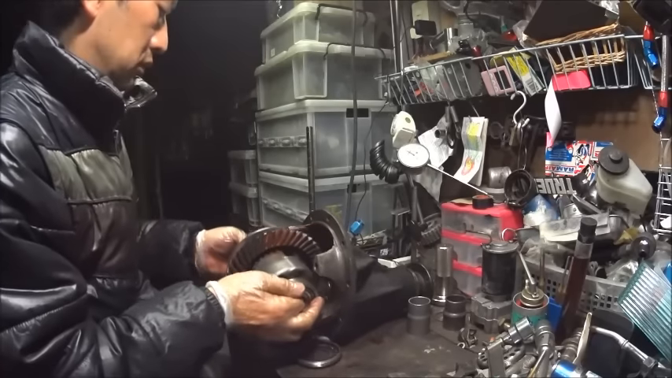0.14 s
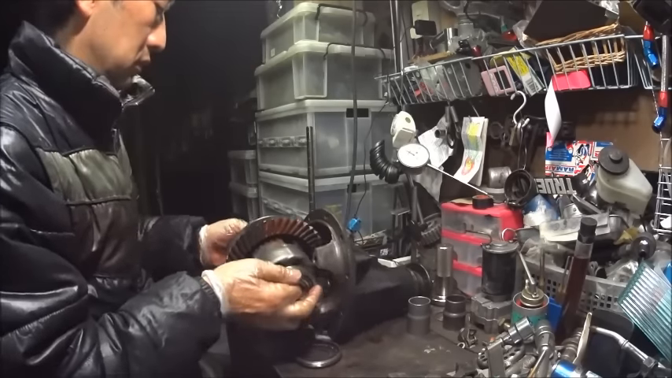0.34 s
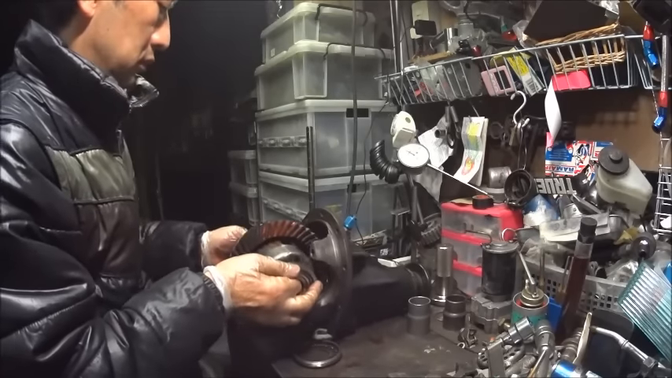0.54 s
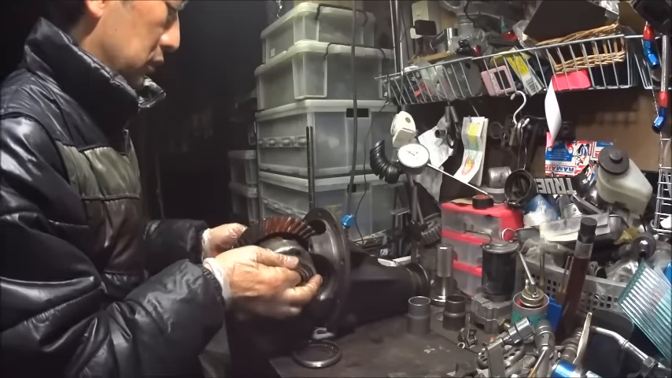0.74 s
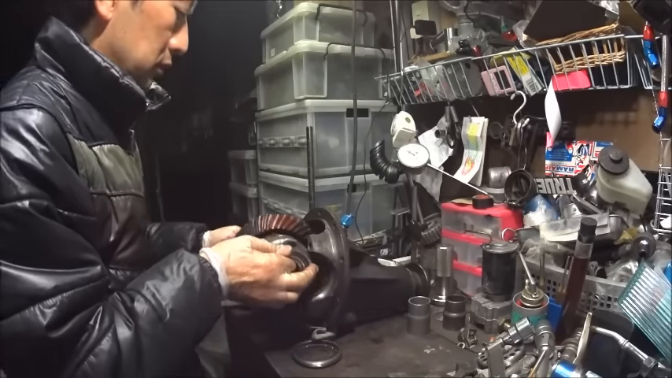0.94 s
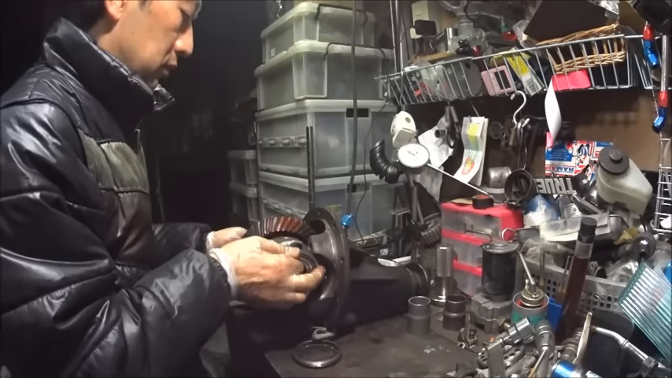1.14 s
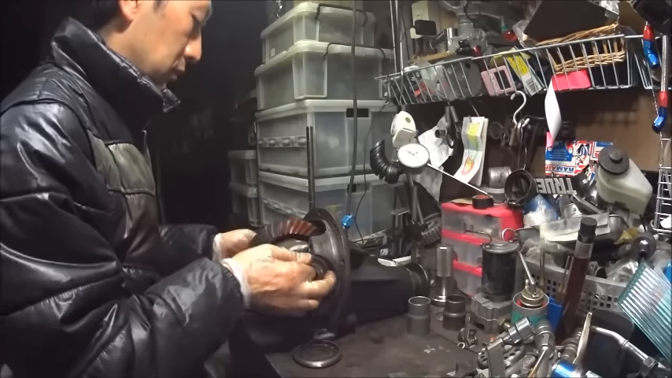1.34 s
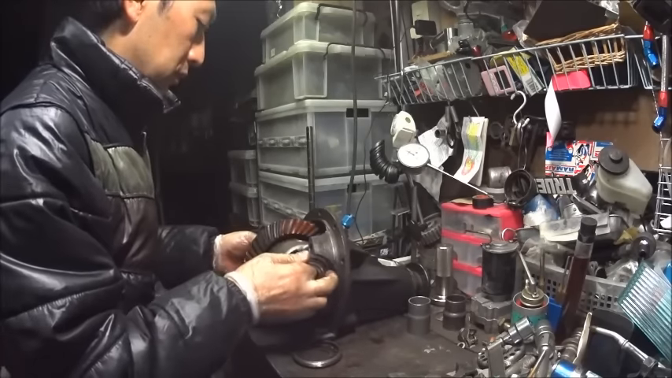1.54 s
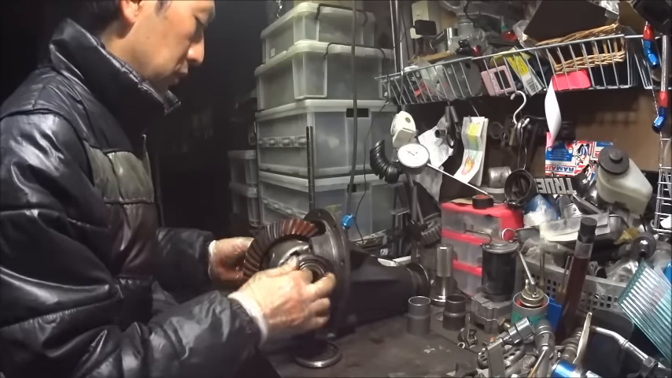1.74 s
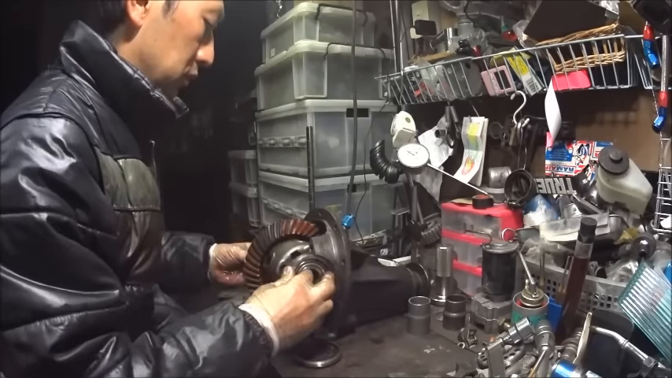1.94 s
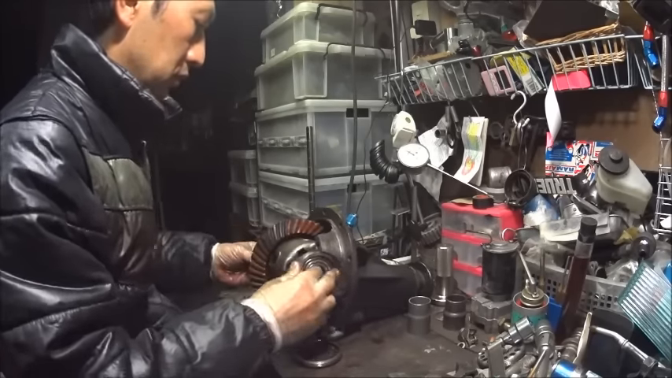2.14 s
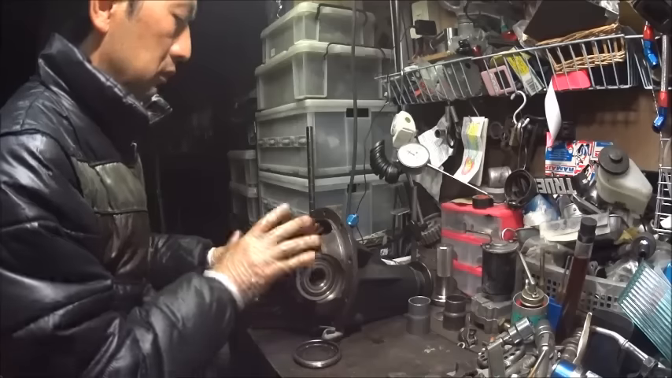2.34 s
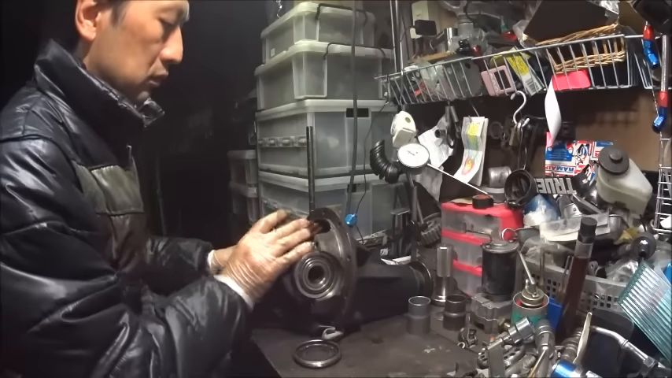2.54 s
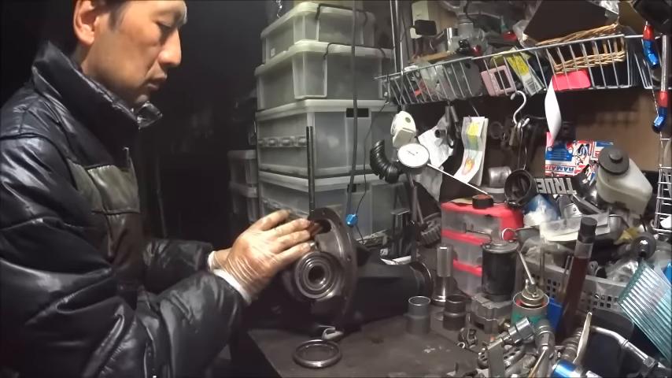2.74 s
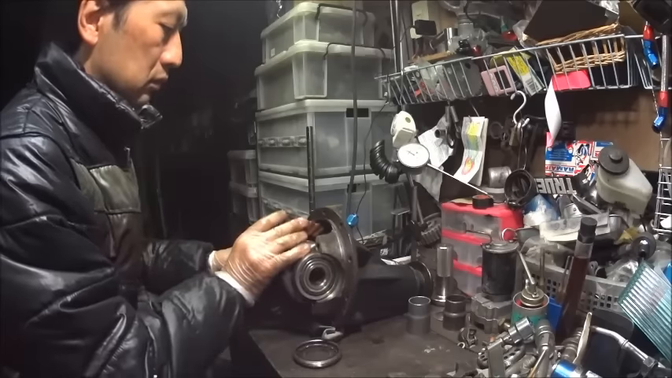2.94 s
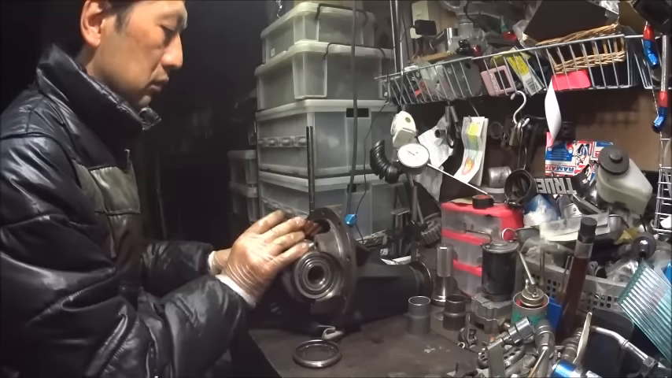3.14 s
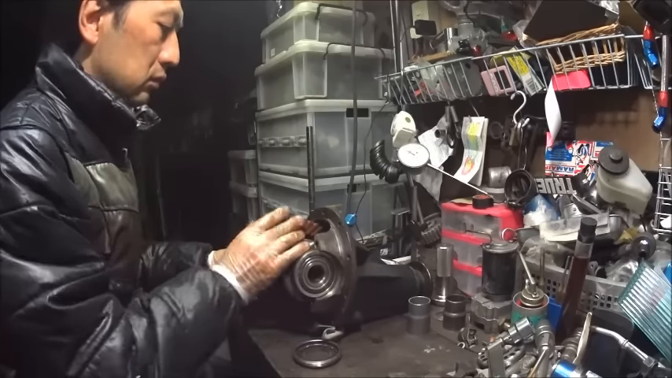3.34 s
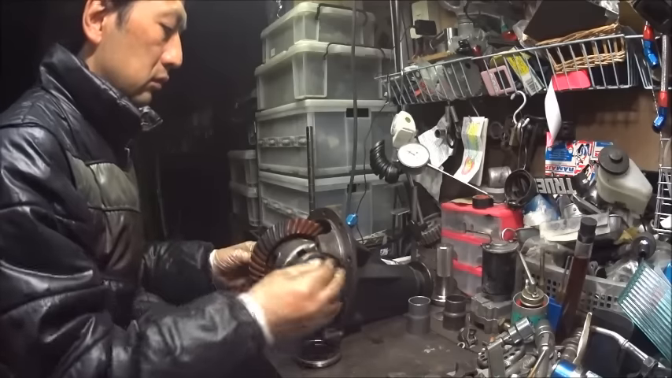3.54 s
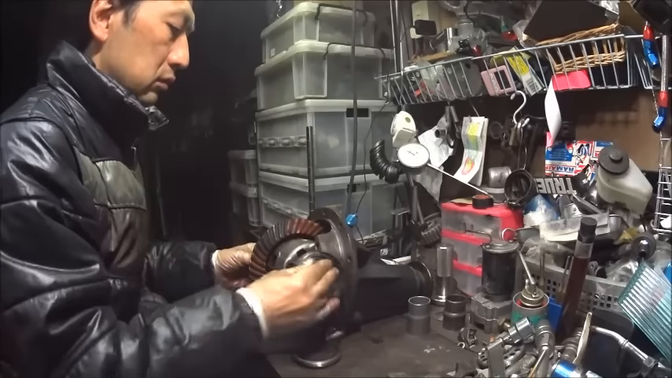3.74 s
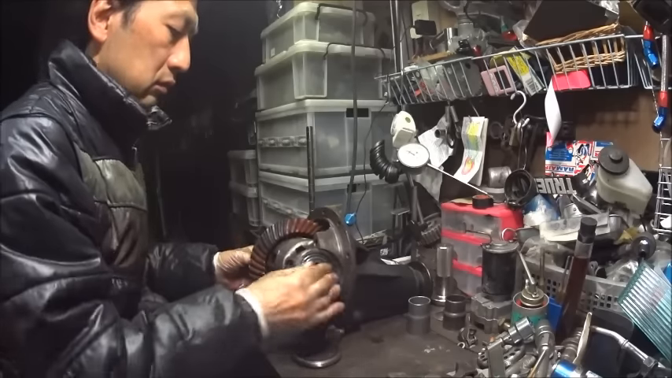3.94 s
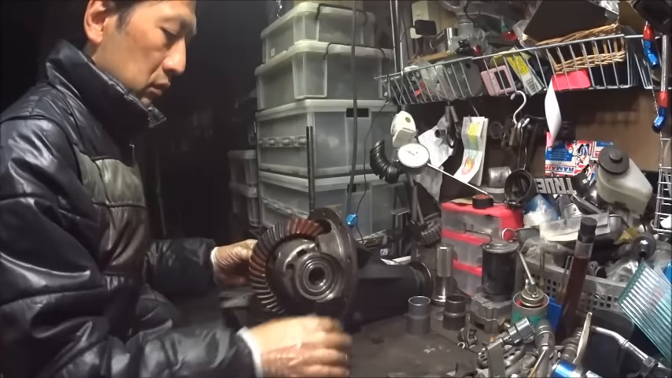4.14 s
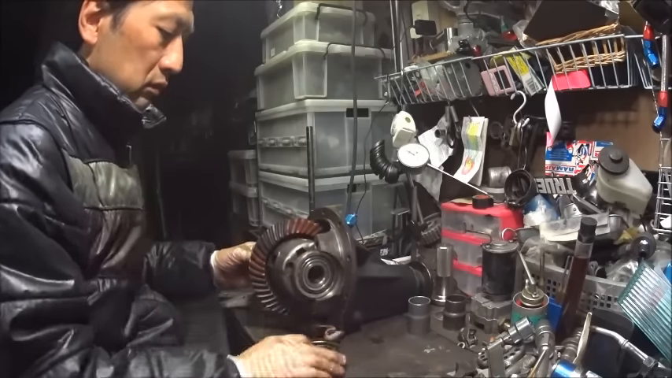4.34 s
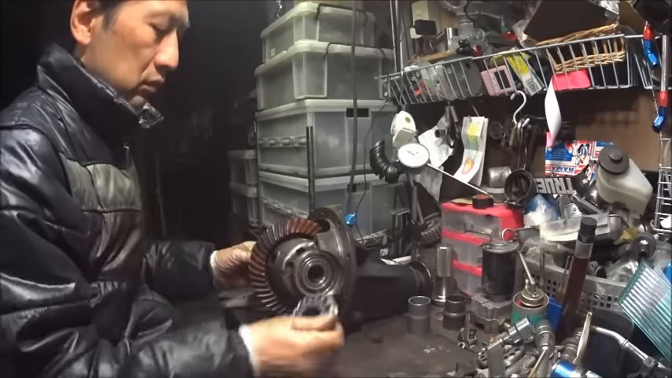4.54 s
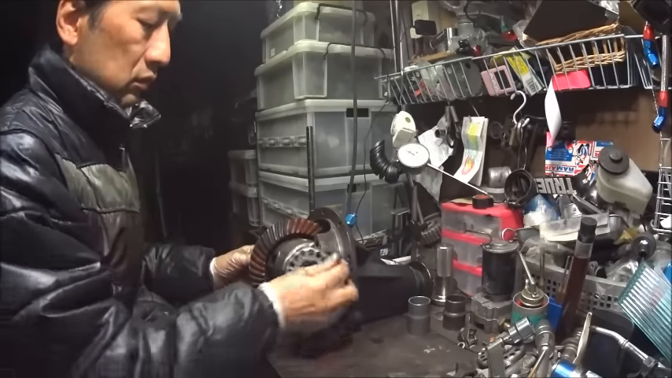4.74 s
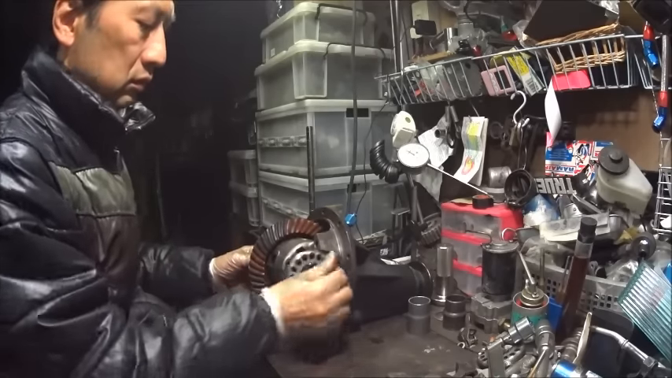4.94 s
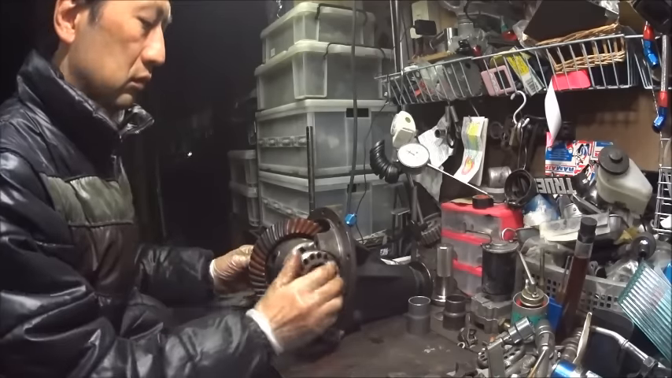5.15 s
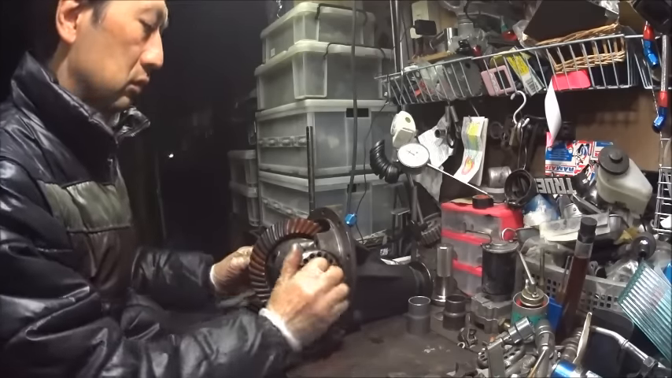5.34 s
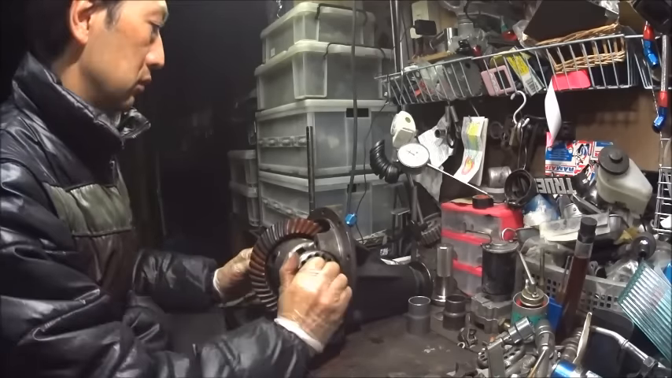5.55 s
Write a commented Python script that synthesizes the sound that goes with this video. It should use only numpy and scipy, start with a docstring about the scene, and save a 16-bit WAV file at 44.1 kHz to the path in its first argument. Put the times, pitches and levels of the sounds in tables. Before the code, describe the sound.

A heavy steel gear knocks and thumps irregularly on a workbench, then a small bearing ring clinks brightly, with jacket rustle in a small garage.

```python
"""A heavy steel gear assembly knocks in its housing and thumps the workbench of a small, cluttered garage.
Then a bearing ring is slid off the bench and clinks into its seat: blows ring decaying modes and noise
through a springy contact. Steel that slides or scrapes is a run of small catches over a hiss.
A padded nylon jacket swishes as a spray of ticks; steady coloured noise, a drone and a whirr fill the room."""
import sys
import numpy as np
from scipy import signal
from scipy.fft import rfft, irfft, next_fast_len
from scipy.io import wavfile

SR = 44100
rng = np.random.default_rng(int(sys.argv[2]) if len(sys.argv) > 2 else 0)


def log_audio(samples):
    """Write samples as a 16-bit WAV file to the path given in sys.argv[1]."""
    # one column per channel
    frames = np.atleast_2d(samples).T
    # limit to full scale, then quantise
    limited = np.clip(frames, -1, 1)
    pcm = np.round(limited * 32767).astype(np.int16)
    wavfile.write(sys.argv[1], SR, pcm)


N = 250488
TOP_HZ = 11100
TIME = np.arange(N) / SR  # s
AGE = TIME[:SR // 7]  # s since a blow
SIDES = np.array([[1], [-1]])  # left, right


def gear():
    """The gear assembly knocks in its housing: lightly damped steel, low contact resonances."""
    # knocks: start_s, bench_rel_db, steel_rel_db, contact_hz (low soft, high hard),
    # contact (0 on the flange, 1 on the hub)
    knocks = [(.012,-39,-53,2210,0.98), (.064,-42.5,-56,1470,0.11), (.1095,-51,-43.5,2180,0.79),
              (.2272,-27.5,-22.5,1620,0.079), (.233,-36.5,-28,2730,0.17), (.3245,-22.5,-28,1700,0.3),
              (.427,-35.5,-51,1900,0.74), (.5105,-19,-33.5,690,0.44), (.598,-39.5,-56,1520,0.82),
              (.638,-30,-34.5,1040,0.67), (.698,-36.5,-66,1110,0.97), (.704,-51,-44,2270,1),
              (.715,-35.5,-69,1500,0.84), (.769,-32.5,-43.5,694,1), (.793,-30.5,-74,730,0.34),
              (.806,-30,-74,1270,1), (1.09,-36.5,-33,1970,0.75), (1.1175,-29,-39,970,.4),
              (1.143,-34,-58,1000,0), (1.165,-30.5,-63,1290,0.89), (1.213,-28,-29.5,1350,0.76),
              (1.2245,-37.5,-30.5,2080,0.6), (1.276,-46,-31.5,730,1), (1.281,-25,-23.5,970,1),
              (1.3285,-31,-33,1700,0.46), (1.3545,-26.5,-28.5,5400,0.84), (1.358,-27,-23.5,1550,0.93),
              (1.427,-32.5,-45.5,1400,0.22), (2.045,-45,-47,1080,0.41), (2.076,-31,-41.5,800,1)]
    # steel modes of the gear: mode_hz, contact_0_rel_db, contact_1_rel_db, undamped_t60_s
    gear_modes = [(700, -3, -3, .04), (921, -4, -8, .1), (991, -9, -10, .09), (1185, -8, 0, .06),
                  (1475, -9, -15, .07), (1755, -14, -5, .06), (1809, -11, 0, .08), (2140, 2, -5, .05),
                  (2192, 3, -1, .07), (2331, -6, -1, .05), (3120, -20, -10, .06), (3570, 4, -11, .04),
                  (3634, 7, -8, .06), (4212, -12, -3, .06), (4790, -10, -8, .07), (4893, -7, -15, .09),
                  (5835, -1, -3, .04), (6934, -7, -7, .06)]
    # dense clatter of the touching parts: freq_hz, rel_db
    gear_clatter = [(600, 14.5), (2200, -5), (5000, -1.5), (11000, -3)]
    return blows(knocks, gear_modes, gear_clatter, q=2.15, snap=1.7, damping_db_per_s=140, held_db=-1.5,
                 clatter_db=-1, clatter_t60_s=0.032, crack_db=11.5, crack_t60_s=0.024,
                 thud_db=12.5, thud_t60_s=0.062, bench_hz=94, steel_hz=580)


def bearing():
    """The bearing ring touches steel: hard bright contacts, strongly damped by the fingers."""
    # clinks: start_s, bench_rel_db, steel_rel_db, contact_hz (low soft, high hard),
    # contact (0 loose, 1 pressed by the fingers)
    clinks = [(2.1975,-54,-45,10900,0.55), (2.838,-54,-38.5,2480,0.38), (2.861,-72,-47,2600,0.84),
              (3.175,-62,-47,2270,0.4), (3.7256,-33.5,-24.5,6550,1), (3.7265,-53,-34.5,3930,1),
              (3.8555,-62,-50,6270,1), (3.8725,-67,-43,6760,0.88), (3.888,-44,-42,5900,0.63),
              (3.898,-33,-37,4900,0.67), (3.9022,-64,-32,5840,1), (4.301,-53,-47.5,6900,.9),
              (4.517,-45,-36.5,10900,1), (4.7793,-73,-17.5,6300,0), (4.7835,-63,-16,9600,0),
              (4.7862,-48,-27.5,3600,0.58), (4.789,-61,-36,3900,0), (4.796,-47,-22,6230,0),
              (4.818,-48,-31,2200,0.76), (4.8885,-45,-31,2000,0.38), (4.968,-57,-44,7500,0.31),
              (5.0595,-54,-38.5,2400,0.24), (5.088,-45.5,-45,690,0.95), (5.0985,-62,-38.5,1900,0.42),
              (5.207,-49.5,-41,2540,0.08)]
    # steel modes of the ring: mode_hz, contact_0_rel_db, contact_1_rel_db, undamped_t60_s
    ring_modes = [(1464, -8, -11, .1), (2078, -4, 4, .09), (2210, 3, -3, .12), (2466, -8, -5, .1),
                  (2590, -5, -2, .09), (3133, -12, -5, .07), (3745, 0, -3, .07), (3841, 5, -2, .055),
                  (4300, -1, -5, .025), (5771, -10, -8, .06), (6550, -8, 2, .04), (7025, -10, -6, .05),
                  (9479, 6, -5, .05), (9651, -2, -7, .1), (10384, 13, -2, .08), (10510, 6, -4, .07),
                  (10941, 11, -2, .065)]
    # dense clatter of the touching parts: freq_hz, rel_db
    ring_clatter = [(600, 2.5), (2200, 1), (5000, -1.5), (11000, -2.5)]
    return blows(clinks, ring_modes, ring_clatter, q=1.0, snap=4.5, damping_db_per_s=1500, held_db=-11.0,
                 clatter_db=-1.5, clatter_t60_s=0.18, crack_db=6.5, crack_t60_s=0.027,
                 thud_db=19.5, thud_t60_s=0.09, bench_hz=126, steel_hz=560)


def blows(events, modes, clatter, q, snap, damping_db_per_s, held_db, clatter_db, clatter_t60_s,
          crack_db, crack_t60_s, thud_db, thud_t60_s, bench_hz, steel_hz):
    """Each blow rings the part through the springy contact, and its weight thumps the bench."""
    # modes of the wooden bench: mode_hz, contact_0_rel_db, contact_1_rel_db, t60_s
    bench_modes = [(94, -21.5, -23, 0.22), (174, -17, -12.5, 0.16), (262, -34, -2, 0.066),
                   (285, -36, 7.5, 0.019), (427.2, -0.5, 0.5, 0.091), (480, -18, -16, 0.05),
                   (677, -9.5, -20, 0.12)]
    attack_s = 0.0012
    times, bench_db, steel_db, contact_hz, contact = np.transpose(events)
    contact = np.clip(contact, 0, 1)
    press = contact[:, None, None]
    pairs = rng.standard_normal((len(times), 2, len(AGE)))
    grain = spread([pairs[:, :1], pairs[:, 1:]], width=0.2)

    # a crack at the contact, then the dense, quickly damped modes of all the parts that touch
    crack_gain = undb(crack_db - 60 * AGE / crack_t60_s)
    clatter_gain = undb(clatter_db - (60 / clatter_t60_s + damping_db_per_s * press) * AGE)
    tones = undb(held_db * press) * ring(modes, contact, damping_db_per_s, scatter_db=3.8)
    steel = tones + colour(grain, clatter) * (crack_gain + clatter_gain)
    steel = contact_spring(steel, contact_hz, q, snap)
    steel = band(steel, steel_hz, TOP_HZ + 400, order=4)  # small parts radiate no bass

    thud = grain * undb(thud_db - 60 * AGE / thud_t60_s)
    bench = ring(bench_modes, contact, 0, scatter_db=0.6) + thud
    bench = bench * (1 - np.exp(-AGE / attack_s))  # the heavy top takes a moment to get moving
    bench = band(bench, 44, 1350, order=2)
    bench = band(bench, bench_hz, 426, order=2)  # the wooden top passes no treble

    out = np.zeros((2, N))
    for start_s, sound in zip(times, at_level(steel, steel_db) + at_level(bench, bench_db)):
        add(out, start_s, sound)
    return out


def ring(modes, contact, damping_db_per_s, scatter_db, width=0.65):
    """Decaying modes per blow (blows x 2 x samples), weighted by contact and chance; contact damps them."""
    hz, db0, db1, t60_s = np.transpose(modes)
    draws = rng.standard_normal((len(contact), 4, len(hz)))
    size, phase, lean, angle = draws.transpose(1, 0, 2)
    weight_db = db0 + contact[:, None] * (db1 - db0) + scatter_db * size
    weight = undb(weight_db) * np.exp(.5j * phase)
    # the high modes radiate unevenly to left and right
    side = width * hz / (hz + 1000) * lean * np.exp(1j * np.pi * angle)
    tones = undb(-60 * AGE / t60_s[:, None]) * np.exp(2j * np.pi * hz[:, None] * AGE)
    sound = ((weight[:, None] * (1 + SIDES * side[:, None])) @ tones).imag
    return sound * undb(-damping_db_per_s * contact[:, None, None] * AGE)


def contact_spring(x, hz, q, snap):
    """Damped contact spring: shapes its resonance, passes less and less above it; snap adds treble."""
    size = 2 * len(AGE)
    s = 1j * np.fft.rfftfreq(size, 1 / SR) / hz[:, None, None]
    response = (1 + snap * s) / (1 + s / q + s * s)
    return irfft(rfft(x, size) * response)[..., :len(AGE)]


def at_level(sounds, db):
    """Bring each blow to its level: its whole energy as rms over 20 ms."""
    rms = np.sqrt(np.sum(sounds ** 2, axis=(1, 2)) / (2 * .02 * SR))
    return sounds * (undb(db) / rms)[:, None, None]


def add(out, start_s, sound):
    """Mix a short sound in at start_s."""
    i = int(max(start_s, 0) * SR)
    out[:, i:i + sound.shape[1]] += sound[:, :N - i]


def slides():
    """Steel slides or rolls over the bench or in its seat: dull friction."""
    # strokes: centre_s, rel_db, half_s (to 1/e of the power)
    slide_strokes = [(.68, -52, 0.046), (.81, -58.5, 0.062), (1.155, -55, 0.014), (1.48, -44.5, 0.013),
                     (2.11, -44.5, 0.039), (4.41, -47, 0.0055), (4.472, -36.5, 0.015), (4.505, -39, 0.016),
                     (5.63, -53.5, 0.21)]
    # spectrum: freq_hz, rel_db
    slide_colour = [(100, -15.5), (200, -3.5), (300, 2), (400, -2), (550, -4), (800, -12), (1500, -6),
                    (2200, -15.5), (5000, -23), (11000, -30)]
    return friction(slide_strokes, slide_colour, catches_per_s=810, hiss=0.24)


def scrapes():
    """The ring scrapes lightly on steel: bright friction with dense catches."""
    # strokes: centre_s, rel_db, half_s (to 1/e of the power)
    scrape_strokes = [(1.47, -68, 0.0063), (3.805, -44, .012), (3.847, -36, 0.009), (5.28, -38.5, 0.018)]
    # spectrum: freq_hz, rel_db
    scrape_colour = [(500, -35), (2500, -21), (4300, -3), (5500, -11), (7200, -8), (9000, -20),
                     (11000, -7.5)]
    return friction(scrape_strokes, scrape_colour, catches_per_s=2400, hiss=0.18)


def friction(strokes, spectrum, catches_per_s, hiss):
    """Sliding steel sticks and slips: a run of small random catches over a fine hiss."""
    catches = (rng.random(N) < catches_per_s / SR) * rng.standard_normal(N)
    rub = catches + hiss * spread(rng.standard_normal((2, N)), width=0.34)
    return colour(rub, spectrum) * swells(strokes)


def jacket(grain_db=2.5, sleeve_db=4.0, folds_db=2.0):
    """Nylon threads catch on each other in a dense spray of tiny ticks, as fast as the arm moves."""
    # sleeve rub following the arm speed: time_s, rel_db (before sleeve_db)
    arm = [(0.0, -52), (0.22, -57.5), (0.68, -66.5), (1.19, -97), (1.33, -57.5), (2.1, -57), (2.24, -57),
           (2.36, -50), (2.96, -62.5), (3.27, -67.5), (3.57, -59), (4.08, -55.5), (4.51, -47), (4.7, -44),
           (4.98, -51), (5.19, -46.5), (5.44, -52.5), (5.68, -61.5)]
    # single swishes at a reach or a change of grip: centre_s, rel_db, half_s (to 1/e of the power)
    swishes = [(.115, -42, 0.026), (.45, -39.5, 0.013), (.893, -44, 0.013), (1.64, -46.5, 0.035),
               (2.245, -40, 0.033), (2.41, -39, 0.051), (2.525, -42, 0.021), (2.72, -47.5, .03),
               (3.39, -45, 0.035), (3.53, -44.5, 0.09), (3.83, -48.5, 0.094), (4.19, -45, 0.061),
               (4.36, -38.5, 0.026), (4.52, -38.5, 0.045), (4.6, -44, 0.024), (5.21, -37.5, 0.017),
               (5.29, -48, 0.026)]
    # spectrum of the nylon: freq_hz, rel_db
    cloth = [(300, -41), (650, 1), (1200, -2.5), (2200, -4), (4300, -5), (7000, -4), (9000, -6.5),
             (11000, -2.5)]
    tick_db = grain_db * np.minimum(rng.exponential(size=N), 5)
    threads = rng.standard_normal((2, N)) * undb(tick_db)
    sleeve = undb(np.interp(TIME, *np.transpose(arm)) + sleeve_db)
    speed = np.hypot(sleeve, swells(swishes))
    folds = undb(folds_db * walk(90))
    return colour(spread(threads, width=0.43), cloth) * speed * folds


def swells(rows):
    """Envelope of bell-shaped swells, summed as power."""
    return np.sqrt(sum(undb(db) ** 2 * np.exp(-((TIME - s) / half_s) ** 2) for s, db, half_s in rows))


def air(wash_db=-50.5, drone_db=-61, whirr_db=-68):
    """Room noise: a wide, nearly steady wash, with narrow noise bands as low drone and faint whirr."""
    # spectrum of the wash: freq_hz, rel_db
    wash_colour = [(20, -7.5), (44, -4.5), (150, -1.5), (200, -2), (330, -7), (600, -6), (1200, -12.5),
                   (3300, -21.5), (6000, -29), (11000, -29)]
    noise = spread(rng.standard_normal((2, N)), width=0.9)
    wash = colour(noise, wash_colour) * undb(wash_db + 0.12 * walk(2.2))
    drone = unit(band(rng.standard_normal(N), 197, 202.7, order=1)) * undb(drone_db)
    whirr = unit(band(rng.standard_normal(N), 684, 685, order=1)) * undb(whirr_db)
    return wash + drone + whirr


def walk(points_per_s):
    """Random wander: normal draws joined by straight lines."""
    return np.interp(TIME * points_per_s, np.arange(4096), rng.standard_normal(4096))


def garage(x, early_db=-11, early_t60_s=0.12, late_db=-24, late_t60_s=0.636, gap_s=0.0064):
    """Close shelves scatter the sound after a few ms; the clutter leaves only a short, weak tail."""
    age, tail = TIME[:SR // 2], 0
    for db, t60_s in (early_db, early_t60_s), (late_db, late_t60_s):
        noise = spread(rng.standard_normal((2, len(age))), width=0.41)
        echoes = noise * undb(-60 * age / t60_s) * (age > gap_s)
        tail = tail + undb(db) * echoes / np.sqrt(np.sum(echoes ** 2) / 2)
    return x + signal.fftconvolve(x.mean(0)[None], tail, axes=1)[:, :N]


def undb(db):
    """Decibels to gain."""
    return 10 ** (np.asarray(db) / 20)


def unit(x):
    """Scale to rms 1."""
    return x / np.sqrt(np.mean(x ** 2))


def band(x, lo_hz, hi_hz, order):
    """Causal band-pass."""
    return signal.sosfilt(signal.butter(order, [lo_hz, hi_hz], "band", fs=SR, output="sos"), x)


def colour(x, points):
    """Filter by a curve of (Hz, dB) points, then scale to rms 1."""
    hz, db = np.transpose(points)
    length = x.shape[-1]
    size = next_fast_len(length, True)
    grid_hz = np.fft.rfftfreq(size, 1 / SR) + 1  # + 1 avoids log(0)
    gain = undb(np.interp(np.log(grid_hz), np.log(hz), db))
    return unit(irfft(rfft(x, size) * gain, size)[..., :length])


def spread(pair, width, corner_hz=700):
    """Two unrelated signals as mid and side; the bass stays in the middle."""
    side = signal.sosfilt(signal.butter(1, corner_hz, "high", fs=SR, output="sos"), pair[1])
    return pair[0] + width * SIDES * side


def scene():
    """Gear, bearing ring and friction in the garage, with the jacket and the room noise."""
    steel = undb(-0.47) * gear() + undb(-0.75) * bearing()
    rubbing = undb(2.5) * slides() + scrapes()
    return garage(steel + rubbing) + jacket() + air()


def record(dry, lean=0.14):
    """The left microphone is a little brighter than the right; the top is cut steeply."""
    treble = signal.sosfilt(signal.butter(1, 8000, "high", fs=SR, output="sos"), dry)
    low_pass = signal.ellip(12, .2, 70, TOP_HZ, fs=SR, output="sos")
    return signal.sosfilt(low_pass, dry + lean * SIDES * treble)


dry = scene()
out = record(dry)
log_audio(out)
```